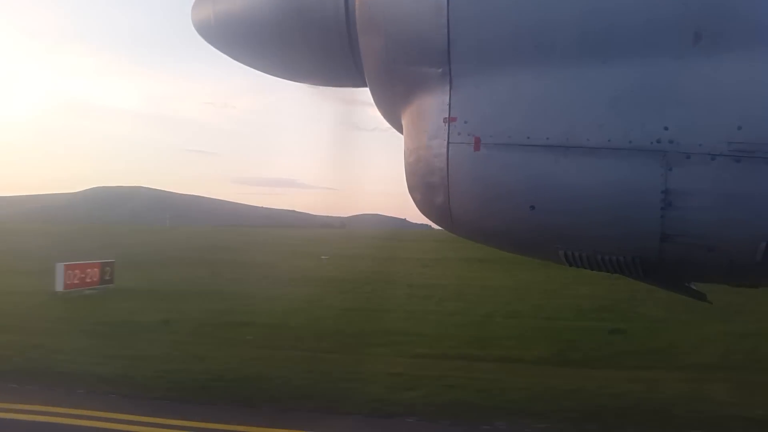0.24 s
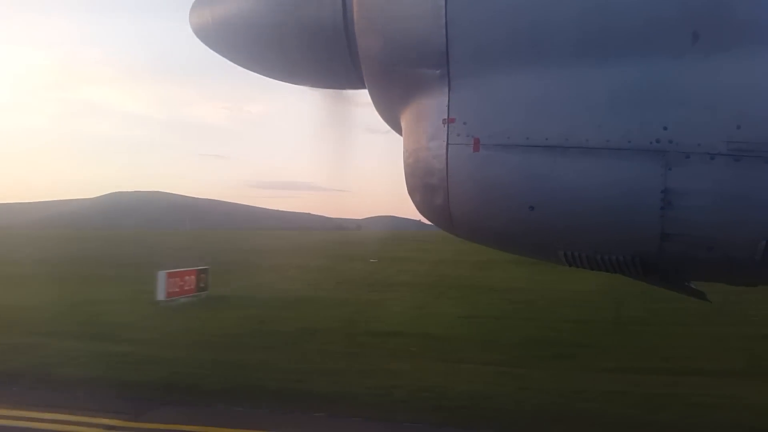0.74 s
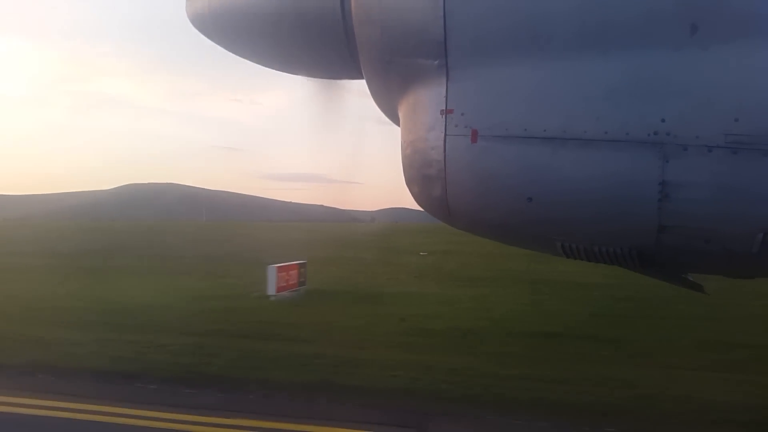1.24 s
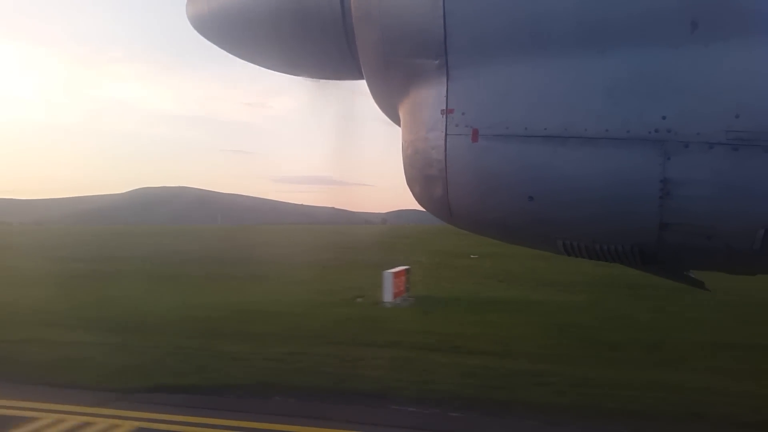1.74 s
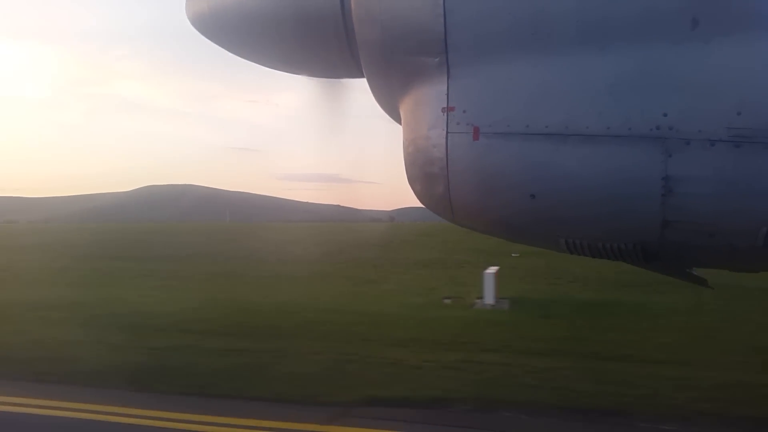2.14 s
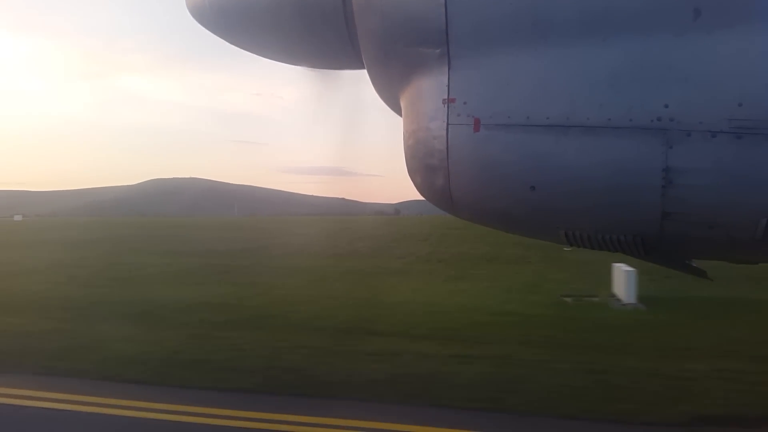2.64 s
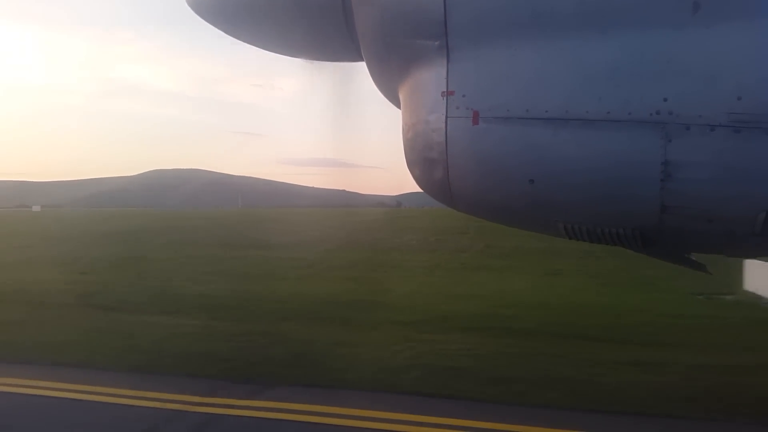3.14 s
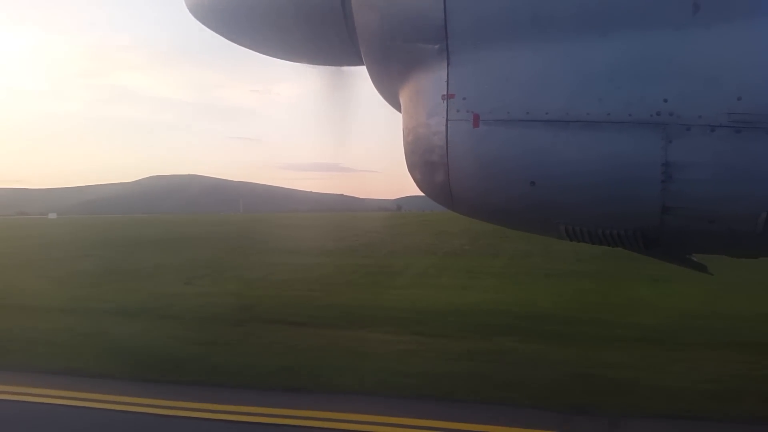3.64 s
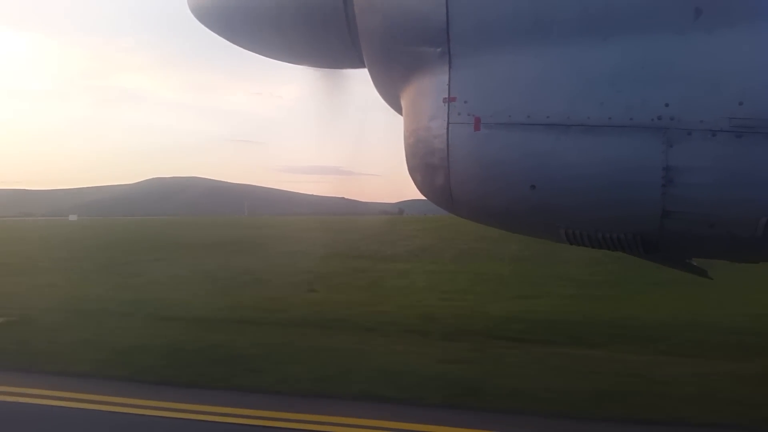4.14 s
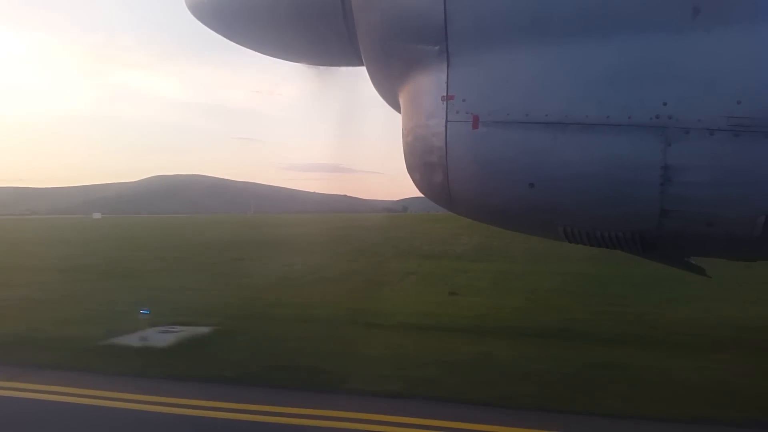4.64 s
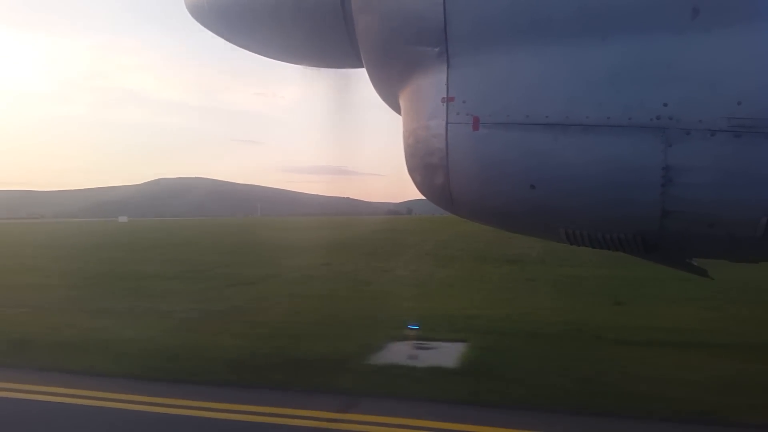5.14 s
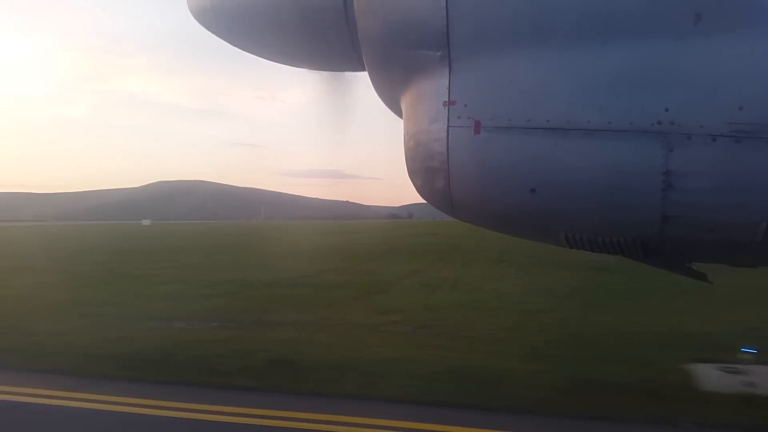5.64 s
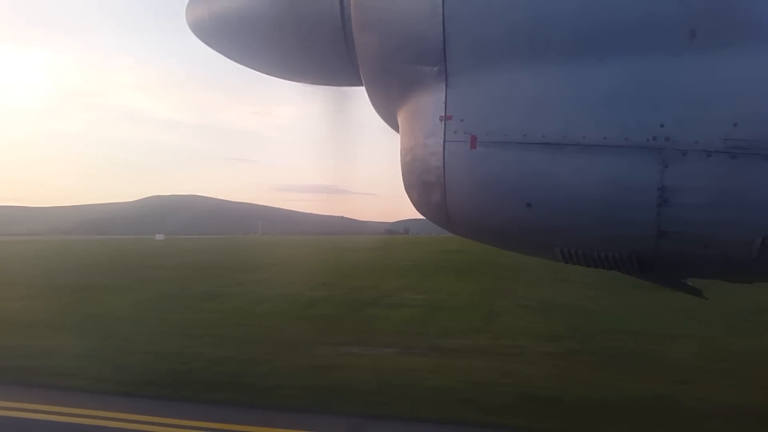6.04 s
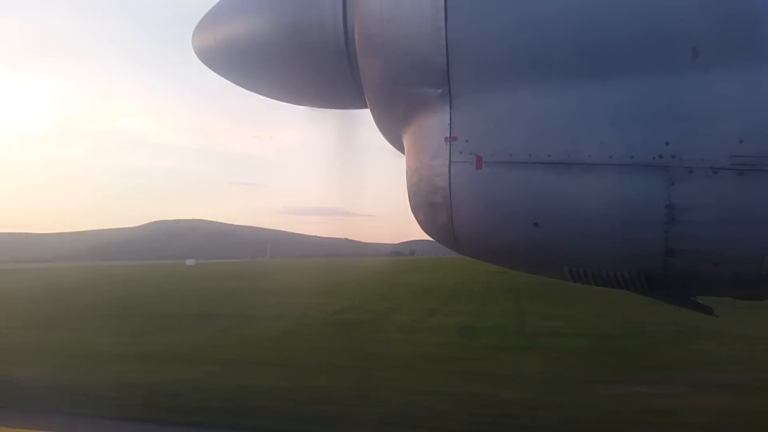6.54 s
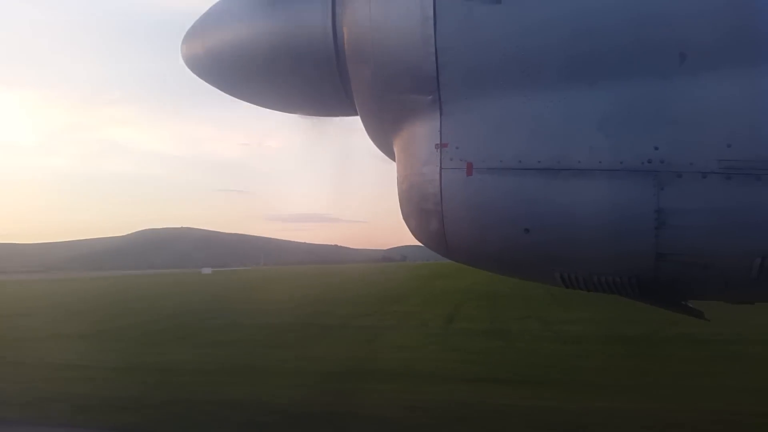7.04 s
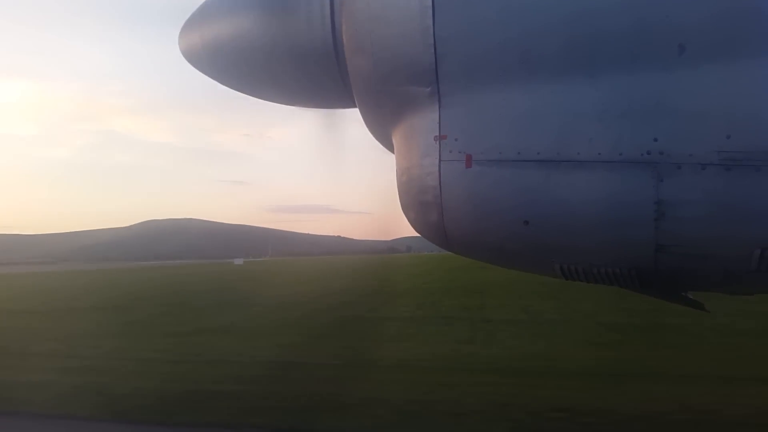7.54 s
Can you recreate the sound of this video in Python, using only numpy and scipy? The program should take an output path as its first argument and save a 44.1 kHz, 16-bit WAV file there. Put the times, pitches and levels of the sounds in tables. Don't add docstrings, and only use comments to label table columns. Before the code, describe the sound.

Two turboprop engines drone low and steady inside a cabin, throbbing about once every two seconds, then power drops into a sagging, rough buffeting.

```python
import sys
import numpy as np
from scipy import signal
from scipy.fft import rfft, irfft, next_fast_len
from scipy.io import wavfile

SR = 44100
rng = np.random.default_rng(int(sys.argv[2]) if len(sys.argv) > 2 else 0)


def elevation(decibels):
    levels = np.asarray(decibels, float)
    return 10 ** (levels / 20)


def persist_wave(psi):
    counts = np.round(np.clip(psi, -1, 1) * 32767).astype(np.int16)
    wavfile.write(sys.argv[1], SR, np.atleast_2d(counts).T)


N = 343518


def in_time(rows):
    s, *columns = np.transpose(rows)
    return [np.interp(np.arange(N) / SR, s, c) for c in columns]


def at_hz(points, hz):
    point_hz, point_db = np.transpose(points)
    return np.interp(np.log(hz), np.log(point_hz), point_db)


def drift(rate_hz):
    pole = np.exp(-200 * np.pi * rate_hz / SR)
    noise = rng.standard_normal(N // 100 + 2002)
    slow = signal.lfilter([1], [1, -2 * pole, pole * pole], noise)[2000:]
    return signal.upfirdn(np.bartlett(201)[1:], slow / slow.std(), 100)[100:N + 100]


def pan(x, lr_db):
    return np.array([x * elevation(lr_db / 2), x * elevation(-lr_db / 2)])


def coloured(spectrum):
    # frequency in Hz, left-right correlation.
    likeness = [(60, 0.55), (130, 0.12), (290, 0.86), (640, 0.66), (1410, -0.23), (3100, 0.13),
                (6820, -0.34), (15000, 0.39)]
    # frequency in Hz, left over right in dB.
    leftness = [(60, 6), (99, -3), (160, -6), (270, 1), (450, 4), (740, -2), (1220, 3), (2010, 2),
                (3330, 9.5), (5500, 15.5), (9080, 0), (15000, -11.5)]
    size = next_fast_len(N)
    hz = np.maximum(np.arange(size // 2 + 1) * SR / size, 1)
    mid, side = rfft(rng.standard_normal((2, size)))
    alike = np.clip(at_hz(likeness, hz), -1, 1)
    pair = np.sqrt(1 + alike) * mid + np.sqrt(1 - alike) * side * [[1], [-1]]
    inside = (hz > spectrum[0][0]) & (hz < spectrum[-1][0])
    gain = pan(inside * elevation(at_hz(spectrum, hz)), at_hz(leftness, hz))
    out = irfft(pair * gain, size)[:, :N]
    return out / out.mean(axis=0).std()


def tone(turns, rough, rate_hz=14):
    height = np.sqrt(2) * (1 + rough * drift(rate_hz))
    return height * np.sin(2 * np.pi * turns + rough * drift(rate_hz))


def throb(turns, depth_db):
    return elevation(depth_db * np.cos(2 * np.pi * turns))


def blade_tones(near, slip, buffet):
    # multiple of blade rate, near level in dB, far level in dB, far path lag in turns,
    # change when buffeting in dB, left over right in dB.
    multiples = [(1, -16.2, -26.5, .66, -1, -1), (2, -18.7, -19.0, .4, -1.5, -1.5),
                 (3, -15.2, -23, .41, -6, .5), (4, -33, -36, .3, 5, 1.1)]
    gain_db, sag_loss_db = 0.5, -17
    wall_spread_turns = .322
    rough, speed = 0.11 + 0.52 * buffet, np.gradient(near)
    sag = (speed.max() - speed) / np.ptp(speed)
    out = 0
    for k, near_db, far_db, lag_turns, change_db, lr_db in multiples:
        late_turns = wall_spread_turns * k ** 2
        waver = rough * min(k / 2, 1) ** .5
        loss_db = (k == 1) * sag_loss_db
        both = elevation(near_db) * tone(k * near + late_turns, waver)
        both = both + elevation(far_db + loss_db * sag) * tone(k * (near - slip) + late_turns + lag_turns, waver)
        out = out + pan(both * elevation(gain_db + change_db * buffet ** 0.81 + loss_db * sag ** 3), lr_db)
    return out


def shaft_tones(near, slip, buffet):
    # multiple in quarters of blade rate, level in dB.
    multiples = [(2, -47), (3, -36), (5, -33), (6, -27), (7, -35), (9, -35), (11, -33), (13, -35),
                 (26, -43)]
    gain_db, far_db = -1.2, -31.5
    out = 0
    for quarters, level_db in multiples:
        turns = quarters * near / 4 + rng.random()
        out = out + elevation(level_db + gain_db - 6 * buffet) * tone(turns, .25, rate_hz=3)
        if quarters == 6:
            out = out + elevation(far_db - 6 * buffet) * tone(turns - 1.5 * slip + .5, .2, rate_hz=3)
    return out


def airframe_rumble(near, buffet):
    # frequency in Hz, density in dB per Hz.
    rumble_spectrum = [(22, -27), (32, -38), (45, -14), (62, -28.5), (100, -45), (140, 2), (200, -5.5),
                       (240, 4), (300, 1.5), (360, -6.5), (430, -33), (600, -72)]
    level_db = -21 - 1 * buffet + 3.06 * drift(4.7)
    return elevation(level_db) * throb(near / 4, depth_db=-0.2) * coloured(rumble_spectrum)


def wall_panel(near, buffet, roar_db):
    # frequency in Hz, density in dB per Hz.
    roar_spectrum = [(250, -4), (400, 2.5), (520, -1), (640, 2), (740, -6), (860, -2), (1000, -15),
                     (1300, -16.5), (1550, -14.5), (1750, -24.5), (2100, -22.5), (3000, -29.5),
                     (4000, -34.5)]
    # multiple of blade rate, level under the roar in dB, change when buffeting in dB.
    panel_multiples = [(5, -5, -5.5), (6, -8.5, -25), (7, -11.5, 10.5), (8, -17, 8.5), (9, -15.5, -6),
                       (10, -15, -3), (11, -39.5, 0), (13, -24, -4)]
    tires_s, tires_db = 4.0, -4
    roar = elevation(-4 - 2.5 * buffet + 1.9 * drift(24)) * throb(near, depth_db=-2.5) * coloured(roar_spectrum)
    drive_db = 1.8 * np.clip(roar_db + 25.5, -6, 3)
    tired_db = tires_db * np.clip(np.arange(N) / SR - tires_s, 0, 1) * (buffet < .3)
    for k, level_db, change_db in panel_multiples:
        buffet_db = change_db * 1.7 * np.maximum(buffet - .3, 0)
        sung_db = level_db + drive_db + (k > 5.5) * tired_db + buffet_db
        sung = elevation(sung_db) * tone(round(k) * near + rng.random(), .25 + .7 * buffet, rate_hz=9)
        roar += [sung, elevation(-2.5) * np.roll(sung, -8)]
    return elevation(np.minimum(roar_db, -21.5)) * roar


def slipstream(near, t):
    # frequency in Hz, density in dB per Hz.
    air_spectrum = [(700, -25), (1100, 7.5), (1550, -1), (1750, -3.5), (2000, -2), (2600, -12.5),
                    (3000, -9), (3400, -21), (5000, -32)]
    level_db, start_db, rise_s = -40, -10, 2.66
    air_db = level_db + start_db * np.exp(-t / rise_s)
    return elevation(air_db + 1.07 * drift(2.2)) * throb(near, depth_db=3.5) * coloured(air_spectrum)


def cabin_boom(buffet):
    # frequency in Hz, level in dB, rise when buffeting in dB.
    cabin_mode = (307, -33, 13)
    mode_hz, mode_db, rise_db = cabin_mode
    level_db = mode_db + rise_db * np.minimum(buffet / .4, 1)
    return elevation(level_db) * tone(mode_hz * np.arange(N) / SR, .7, rate_hz=22)


def compressor_whine(blades, buffet, whine_db):
    # multiple of blade rate, level in dB, chop depth in rad, left over right in dB,
    # change when buffeting in dB.
    lines = [(42.02, -19, .3, 9, -6), (69.69, -14, .9, 11, -9), (72.69, -18, 1.5, 9, 0),
             (77.69, -7.5, 1.2, 12, 4), (80.69, -4, 1.3, 14, -7), (87.69, -17, 1.4, 12, -2),
             (96.88, -18, .7, 6, -1), (99.88, -13, .9, 11, 2), (140, -30, 1.8, 0, 0),
             (155.4, -24, 2.2, 4, 17)]
    gain_db = -2.5
    window_hz, window_width_hz, window_db = 7600, 210, 11
    bend = np.cos(2 * np.pi * blades) / (2 * np.pi)
    stir = buffet ** .35
    smear, rate_hz = stir * drift(40), np.gradient(blades) * SR
    out = 0
    for k, level_db, chop_rad, lr_db, change_db in lines:
        turns = k * blades + chop_rad * bend + 0.0017 * k * smear + rng.random()
        pane_db = window_db / (1 + ((k * rate_hz - window_hz) / window_width_hz) ** 4)
        line = tone(turns, 0.14, rate_hz=37)
        out = out + pan(elevation(level_db + change_db * stir + pane_db) * line, lr_db)
    out = elevation(whine_db + gain_db) * throb(blades, depth_db=5) * out
    out[1] = np.roll(out[1], 60) * elevation(3 * drift(15))
    return out


def intake_hiss(blades, whine_db):
    # frequency in Hz, density in dB per Hz.
    hiss_spectrum = [(2940, -47), (5000, -43), (5470, -7.5), (5630, -16.5), (6070, -4.5), (6490, -2),
                     (6740, 2), (6960, -1), (7130, 2), (7730, -3), (8330, 1), (9880, -1.5), (11300, -7.5),
                     (13300, -9.5), (15500, -36)]
    level_db = -45.5 + 0.48 * (whine_db - whine_db.mean()) + 1.07 * drift(19)
    return elevation(level_db) * throb(blades, depth_db=1.5) * coloured(hiss_spectrum)


def trim_buzz(near, buzz_db):
    # frequency in Hz, density in dB per Hz.
    buzz_spectrum = [(2600, 0.5), (3400, -7.5), (4000, -2), (4400, -3.5), (4700, -3.5), (5200, -9.5),
                     (5800, -14)]
    return elevation(buzz_db + 0.5 * drift(24)) * throb(near, depth_db=2.0) * coloured(buzz_spectrum)


def catch_ticks(near, buffet, t):
    # centre in seconds, half length in seconds, rise above rest in dB.
    spells = [(0.698, 0.22, 4.5), (1.45, 0.37, 5), (2.53, .12, 6), (3.086, .25, 4), (4.601, .15, 2),
              (5.01, 0.059, 7.5), (5.456, 0.13, 4.5), (5.85, 0.31, 6.5), (6.353, 0.26, 5), (7.4, 0.31, 10)]
    rest_db = -58
    loose_db = rest_db + sum(rise_db * np.exp(-((t - s) / half_s) ** 2) for s, half_s, rise_db in spells)
    at = np.flatnonzero(np.diff(np.floor(near + .3)))
    once_a_turn = np.arange(len(at)) % 4 == 0
    strength_db = 3.2 * rng.standard_normal(len(at)) + 8 * once_a_turn - 1
    shaken_db = 2.0 * np.minimum(loose_db[at] + 51.5, 2)
    clicks = np.full(N, 1e-18)
    clicks[at] = elevation(strength_db + shaken_db - 9.5 * buffet[at] - 15.5) * rng.choice([-1, 1], len(at))
    ring = signal.butter(2, [9450, 10000], "band", fs=SR, output="sos")
    return pan(signal.sosfilt(ring, clicks), -21.5)


def stalled_gusts(near, buffet):
    # frequency in Hz, density in dB per Hz.
    gust_spectrum = [(120, -37), (200, -5), (270, 13.5), (308, -8), (345, 10), (400, 3.5), (550, 0.5),
                     (650, 1), (750, -0.5), (860, 3), (1000, -14), (1250, -7.5), (1600, -23)]
    return buffet ** 1.5 * elevation(-14.5) * throb(near, depth_db=2.0) * coloured(gust_spectrum)


def fitting_squeak(t):
    # centre in seconds, frequency in Hz, level in dB, length in seconds.
    rub = (7.672, 4780, -40, .0035)
    s, hz, level_db, length_s = rub
    since_s = t - s
    burst = elevation(level_db) * np.exp(-(since_s / length_s) ** 2) * np.sin(2 * np.pi * hz * since_s)
    return pan(burst, 5)


def round_beat(slip):
    # slip in turns, wall roar in dB, trim buzz in dB, whine in dB.
    beat = [(0, -25, -47.5, -45.5), (.2, -26, -49.5, -47), (.38, -24.5, -50.5, -44.5),
            (.48, -25, -53.5, -46), (.62, -23.5, -54.5, -45), (.7, -26, -55, -45.5),
            (.82, -28.5, -53, -47.5), (.92, -25.5, -50.5, -45)]
    turns, *columns = np.transpose(beat)
    return [np.interp(slip % 1, turns, c, period=1) for c in columns]


def scene():
    # time in seconds, loud propeller blade rate in Hz, whining engine blade rate in Hz.
    speed_hz = [
        (0, 83.92, 83.42),
        (4, 83.88, 83.42),
        (5.3, 83.8, 83.42),
        (5.75, 83.45, 83.4),
        (6.1, 82.85, 83.1),
        (6.5, 81.75, 81.7),
        (6.8, 80.8, 80.1),
        (7.1, 79.7, 78.9),
        (7.4, 78.5, 77.8),
        (7.79, 77.2, 76.5),
    ]
    # time in seconds, slip of the far propeller in blade turns.
    slip_turns = [(0, -.21), (.4, -.04), (1.33, .45), (2.3, .97), (3.27, 1.45), (3.7, 1.62), (4.1, 1.83),
                  (4.55, 1.95), (5.1, 2.16), (5.7, 2.32), (6.48, 2.1), (6.62, 1.82), (7.27, 1.45),
                  (7.5, 1.17), (7.79, 1.1)]
    # time in seconds, buffeting 0-1.
    buffeting = [
        (6.3, 0),
        (6.6, 0.37),
        (7.02, 0.27),
        (7.15, 0.47),
        (7.3, 0.77),
        (7.55, 0.71),
        (7.79, 0.49),
    ]
    near, blades = np.cumsum(in_time(speed_hz), axis=1) / SR
    t = np.arange(N) / SR
    slip, buffet = in_time(slip_turns)[0], np.clip(in_time(buffeting)[0], 0, 1.3)
    settle_db = -1.5 * np.exp(-t / 0.13)
    roar_db, buzz_db, whine_db = round_beat(slip) + settle_db
    roar_db = roar_db + 18 * np.maximum(buffet - .35, 0)
    buzz_db = buzz_db + 0.5 * (t - 3) - 13.5 * np.maximum(buffet - .3, 0)
    mix = blade_tones(near, slip, buffet) + shaft_tones(near, slip, buffet)
    mix = mix + airframe_rumble(near, buffet) + wall_panel(near, buffet, roar_db)
    mix = mix + slipstream(near, t) + cabin_boom(buffet)
    mix = mix + compressor_whine(blades, buffet, whine_db) + intake_hiss(blades, whine_db)
    mix = mix + trim_buzz(near, buzz_db) + catch_ticks(near, buffet, t)
    return mix + stalled_gusts(near, buffet) + fitting_squeak(t)


def band_limit(x):
    return signal.sosfilt(signal.butter(12, 15640, fs=SR, output="sos"), x)


def record(dry):
    knee, edge_s, t = 1.12, .003, np.arange(N) / SR
    ease = np.sin(np.pi / 2 * np.clip(np.minimum(t, t[-1] - t) / edge_s, 0, 1)) ** 2
    return band_limit(ease * knee * np.tanh(dry / knee))


dry = scene()
out = record(dry)
persist_wave(out)
```